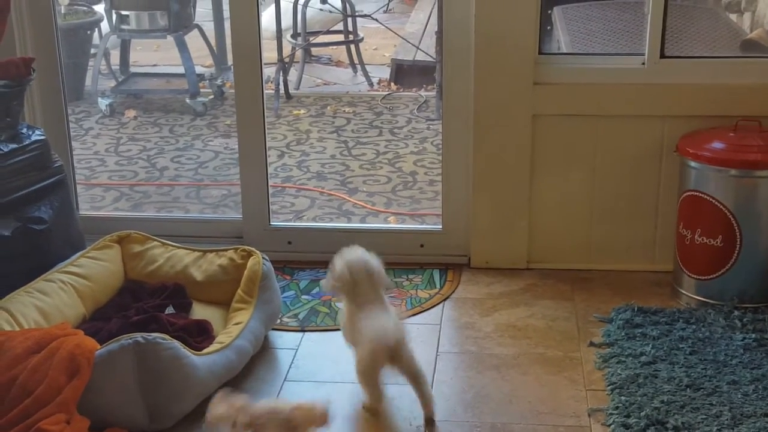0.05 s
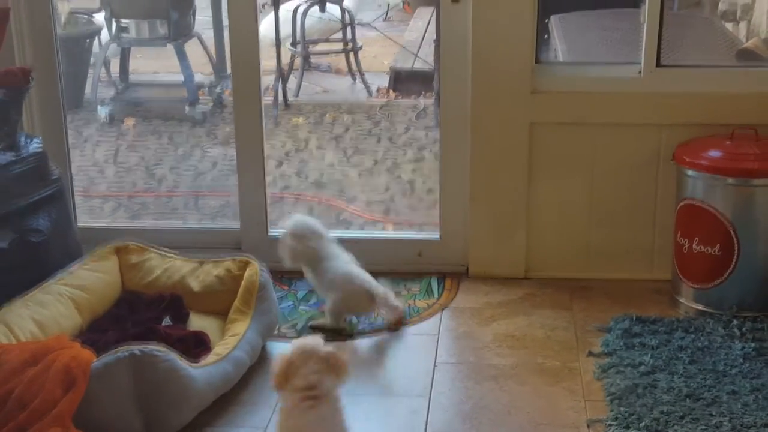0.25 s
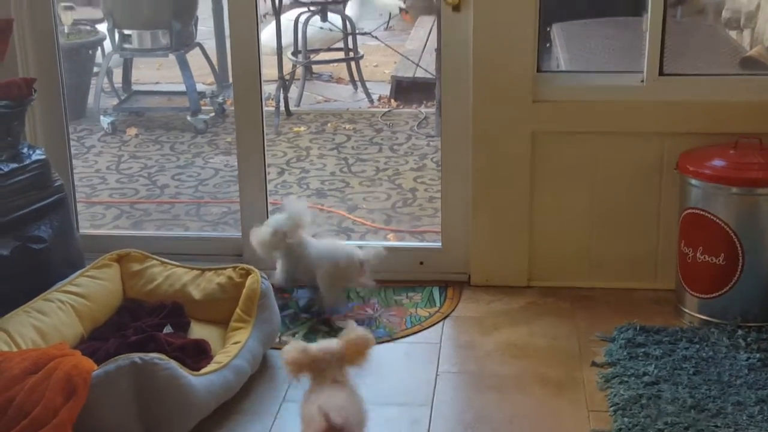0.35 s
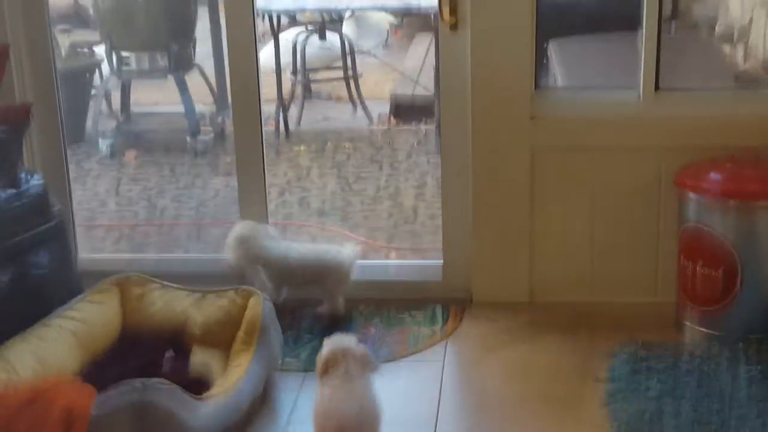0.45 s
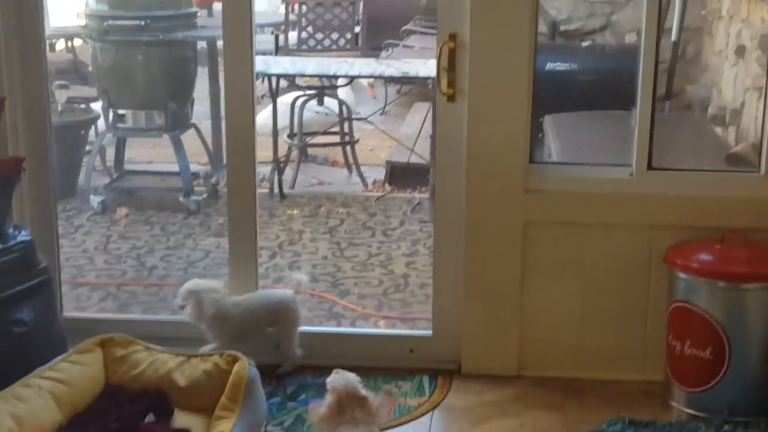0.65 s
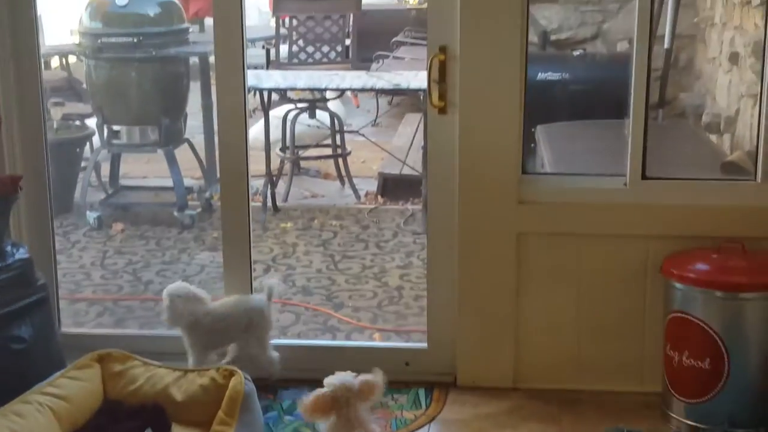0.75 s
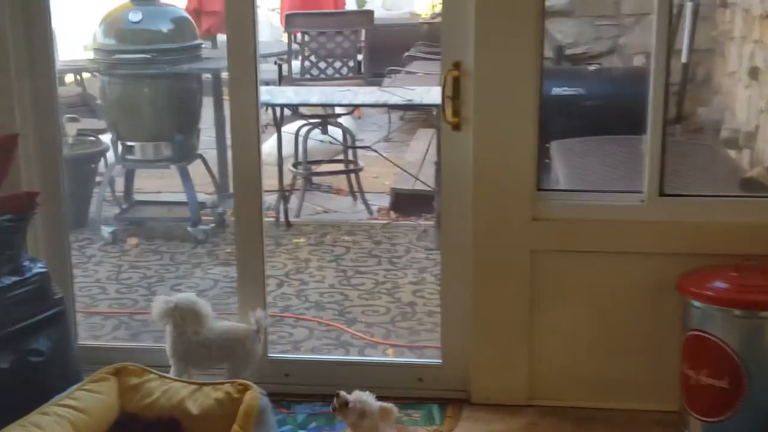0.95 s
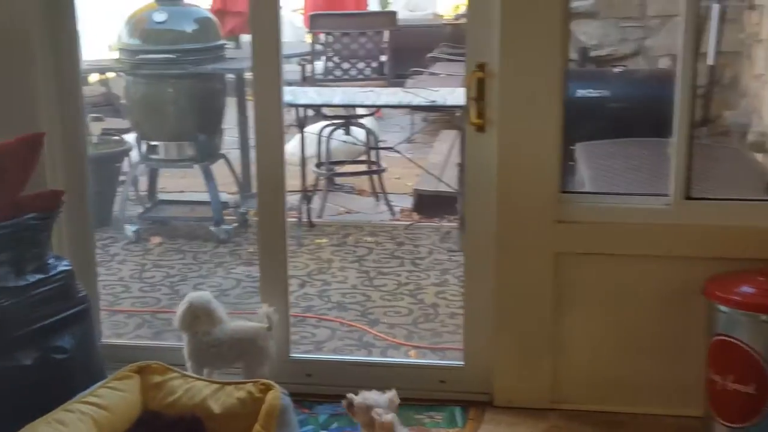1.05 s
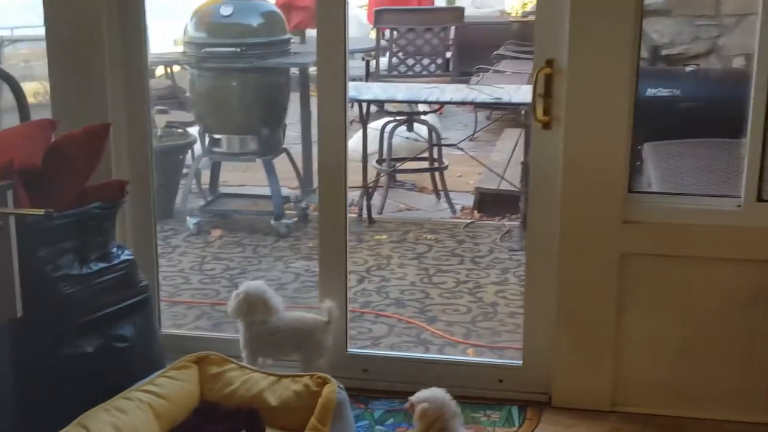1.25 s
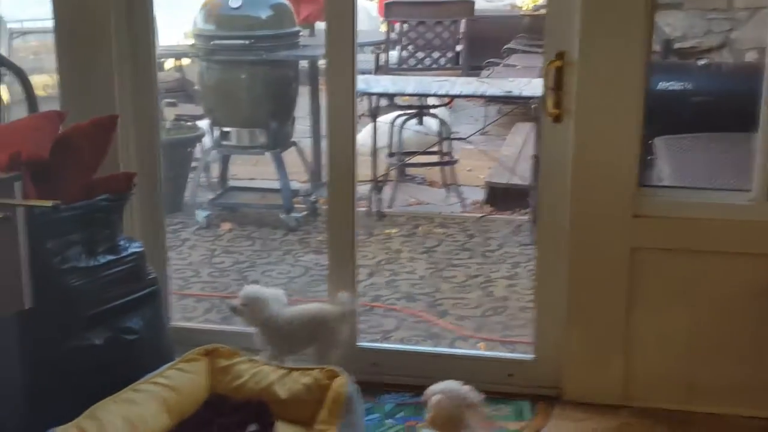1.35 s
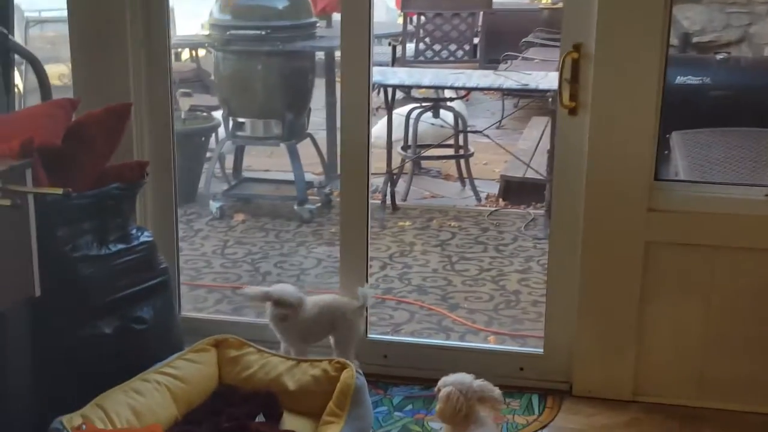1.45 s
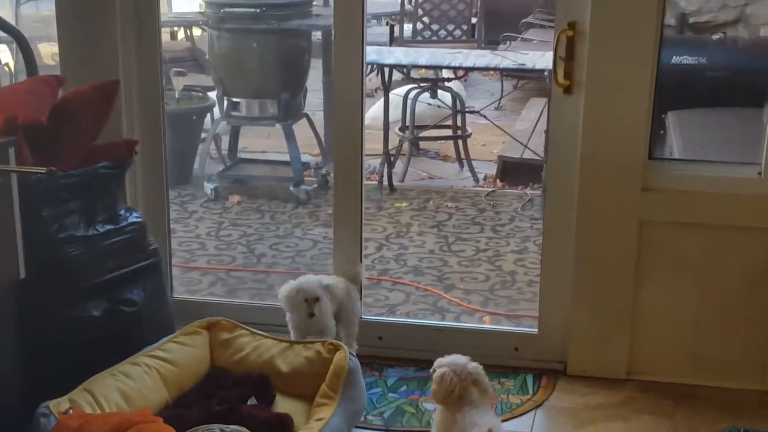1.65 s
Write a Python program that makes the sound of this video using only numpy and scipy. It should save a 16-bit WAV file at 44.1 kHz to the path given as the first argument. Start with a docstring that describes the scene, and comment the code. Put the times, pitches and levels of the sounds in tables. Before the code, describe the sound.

Small dogs give three sharp, high barks in a tiled room, each swooping up to a yelp and falling hoarsely with a short echo. Paws scuff the floor and the handheld microphone thumps softly; faint rustles follow.

```python
"""Small dogs bark in a tiled room: one bark from a nearer dog on the left, then two from another.
Vocal folds buzz through throat and mouth: each bark swoops up from a grunt to a clear yelp, then
breaks and falls hoarsely, and the room rings on. Paws scuff the floor and the handheld phone thumps
softly as it is handled; a tiny tick, rustles and a faint squeak follow over a quiet hush.
The phone's limiter holds the peaks down."""
import sys
import numpy as np
from scipy import signal
from scipy.fft import rfft, irfft
from scipy.io import wavfile
from scipy.ndimage import uniform_filter1d, minimum_filter1d

SR = 44100
rng = np.random.default_rng(int(sys.argv[2]) if len(sys.argv) > 2 else 0)


def dump_mix(stems):
    """Bounce the given channels to the path in sys.argv[1] as a 16-bit WAV at rate SR."""
    frames = np.atleast_2d(stems).T  # one column per channel
    limited = np.clip(frames, -1, 1)  # hard clip at full scale
    pcm = np.round(limited * 32767).astype(np.int16)
    wavfile.write(sys.argv[1], SR, pcm)


N = 74970

# How each bark unfolds, one table per bark: time_s, pitch_hz, level_db, roughness (0-1), mouth_open_db
BARK_SHAPES = [
    [(.204, 300, -51.5, 0.37, 9.5), (.217, 344.5, -25, 1, -26), (.228, 441.8, -19.5, 0.53, 4.5),
     (.24, 499.5, -10.5, 0.26, -4), (.251, 591, -4.5, 0.48, 4.5), (.258, 530, -18, 0.31, 24),
     (.276, 543.3, -16, 0.54, 20), (.292, 534.4, -1.5, 0.07, 2), (.312, 509.9, -8.5, 0.12, -3),
     (.334, 494, -12.5, 0.25, 10.5), (.356, 431.8, -21.5, 0.5, 0.5)],
    [(.636, 219.1, -35, 0.65, -5.5), (.648, 325.8, -27.5, 0.81, 1.5), (.657, 489.4, -15.5, 0.05, 1.5),
     (.667, 596, -11, 0.16, 7.5), (.682, 613.6, -4, 0, -9), (.702, 616.8, -15, 0.05, 17.5),
     (.719, 685.7, -5.5, 0.37, -16), (.726, 522, -10, 0.01, -6), (.742, 470.8, -10.5, 0.29, -5.5),
     (.757, 417.9, -13.5, 0.27, -5), (.776, 335.2, -27, 0.1, 7.5)],
    [(.975, 220.7, -46.5, 0.53, -0.5), (.985, 288.4, -25.5, 0.88, -7), (.996, 467.3, -23.5, 0.66, 7.5),
     (1.005, 559.6, -11, 0.37, 4.5), (1.018, 614.4, -11.5, 0.19, 6.5), (1.032, 662.8, -6.5, 0.04, 8.5),
     (1.045, 663.6, -14.5, 0.11, 15), (1.052, 523, -16, 0.28, 1), (1.068, 513.7, -8, 0.14, -8),
     (1.084, 424.2, -16.5, 0.23, -15.5), (1.11, 350.9, -22.5, 0.3, 2)],
]
# Each bark's character (a pan is left minus right): pan_db, odd_harmonics_db, hiss_db, mouth_pan_db
BARK_VOICES = [(1.9, -7, -30.5, 3), (0.6, -3, -36.5, 0), (-2.2, -0.5, -37, 7)]
# Resonances (boosted frequencies) of the throat: centre_hz, width_hz, level_db
THROAT_PEAKS = [(1143, 283, -0.5), (1574, 400, -23)]
# Mouth resonances, one table per bark, stronger as the mouth opens: centre_hz, width_hz, level_db
MOUTH_PEAKS = [
    [(2068, 420, -14), (2640, 1200, -31), (3055, 380, -22)],
    [(1620, 660, -14.5), (2366, 580, -19.5), (3038, 134, -19.5)],
    [(2058, 157, -13), (2338, 840, -26), (3249, 120, -23)],
]
# What the throat lets through around its resonances: frequency_hz, level_db
THROAT_FLOOR = [(100, -55.5), (300, -46), (520, -36.5), (750, -12), (1600, -16), (3300, -40.5),
                (4200, -50.5), (6000, -78)]
# Colour (bass-to-treble balance) of air hissing past the teeth: frequency_hz, level_db
TEETH_HISS = [(100, -34), (300, -15.5), (1000, 6.5), (3400, 9.5), (4200, 3.5), (5400, 5), (6600, -4.5),
              (8800, -2.5), (10500, -7.5), (13000, -6.5), (16000, -31.5)]
# Chesty grunts and puffs of air that open the barks: start_s, pitch_hz, grunt_db, puff_db
OPENING_GRUNTS = [(0.197, 320, -44, -43.5), (0.218, 220, -38, -49), (.635, 212.3, -40.5, -62.5),
                  (.974, 214.8, -38.5, -54)]

# Small noisy sounds: peak_s, rise_s, decay_s, level_db, pan_db
GRUFF_SWELLS = [(0.598, 0.023, 0.03, -29.5, -3)]  # a soft gruff sound before the second bark
PAW_SCUFFS = [(0.022, 0.0084, 0.028, -43.5, 4), (.053, 0.0096, 0.011, -34.5, 3.5),
              (0.086, 0.0077, 0.015, -60, -5.5), (.166, 0.0037, 0.0047, -62, 17.5),
              (.3, 0.14, 0.13, -55.5, 12), (.42, 0.015, 0.017, -47, 6), (0.459, 0.011, 0.023, -45.5, 8),
              (0.493, 0.02, 0.016, -50, -2), (1.626, .05, 0.036, -55, 2.5)]  # paws and fur brushing the floor
LOW_THUMPS = [(.04, .04, 0.11, -52, -1.5), (0.228, .015, 0.025, -42.5, 1.5),
              (0.421, 0.027, 0.11, -47.5, 4.5), (.52, .018, 0.026, -45.5, -3),
              (0.601, 0.027, 0.033, -46.5, 0)]  # soft low thumps and rumble as the phone is handled
THIN_RUSTLES = [(1.425, 0.038, 0.059, -50, -2), (1.509, 0.0092, 0.02, -53, 1),
                (1.6, 0.036, 0.043, -52, -2.5)]  # after the last bark
# Colours of those sounds, the tick and the background hush: frequency_hz, level_db
GRUFF_NOISE = [(100, -34.5), (280, -8.5), (420, -5), (650, 3), (1100, -10), (1550, 5.5), (2300, -29),
               (3200, -36.5), (4100, -20.5), (6000, -38), (16000, -42)]
SCUFF_NOISE = [(60, -7), (150, -5.5), (400, -12), (800, 0), (1300, -8.5), (2100, -2), (3500, -5),
               (6000, -2.5), (9000, 3), (11000, -5), (13500, 2.5), (16000, -7.5)]
THUMP_NOISE = [(33, -35), (70, -13.5), (135, -3.5), (190, 2), (300, 1.5), (600, -15), (2000, -54.5),
               (16000, -74.5)]
RUSTLE_NOISE = [(200, -34), (800, 3.5), (1500, 5), (2100, 3.5), (2850, 3), (3700, -7), (5500, -7.5),
                (8000, -20), (16000, -36.5)]
TICK_NOISE = [(200, 7), (1000, -18), (4000, -13), (7500, -14), (8400, -14), (9200, 11), (10000, -17),
              (10900, 3), (12000, -16), (16000, -20)]
HUSH_NOISE = [(33, -31), (44, -8), (64, 1), (100, -11), (200, -4.5), (400, -12), (1000, -8), (2500, -11.5),
              (5000, -22.5), (10000, -22), (16000, -26.5)]

# How long the room's echo takes to fade by 60 dB: frequency_hz, fade_s
ROOM_FADE = [(100, 0.87), (500, .5), (1100, 0.46), (2100, 0.49), (4000, 0.54), (9000, 0.25), (16000, .3)]
# Single notes that ring in the room: pitch_hz, fade_s (to fall 60 dB), level_db
ROOM_NOTES = [(2011.6, 0.73, -20), (3260, 0.36, -29)]

VOICE_WOBBLE_HZ = 222  # how fast a voice shakes
ALIKE_BELOW_HZ = 700  # the phone's two microphones hear much the same bass


def bark(t, shape, mouth_peaks, pan_db, odd_db, hiss_db, mouth_pan_db):
    """Vocal folds buzz through throat and mouth; roughness shakes the buzz and adds a breathy rasp."""
    pitch_shake, level_shake, growl_depth = 0.062, 0.26, 0.98
    rasp_db, breath_db, mouth_rasp_db = -4, -33.5, 6
    times, *columns = np.array(shape, float).T
    pitch, level_db, roughness, open_db = (np.interp(t, times, column) for column in columns)
    jaw = (pitch / 543.5) ** 0.69  # the throat's resonances rise with the pitch
    phase = phase_of(pitch * (1 + pitch_shake * roughness * wobble(VOICE_WOBBLE_HZ)))
    throat_tone, mouth_tone, power = 0, 0, 0
    for harmonic in range(1, 9):
        weight = undb(odd_db * (harmonic % 2))
        throat_gain = weight * throat(harmonic * pitch, jaw)
        mouth_gain = weight * undb(open_db) * resonate(mouth_peaks, harmonic * pitch)
        # harmonics above the second each waver on their own
        waver = max(harmonic - 2, 0) * (0.033 + 0.25 * roughness) * wobble(130)
        wave = np.sin(harmonic * phase + waver)
        throat_tone += throat_gain * wave
        mouth_tone += mouth_gain * wave
        power += (throat_gain + mouth_gain) ** 2 / 2
    growl = growl_depth * np.sin(phase / 2)  # every other pulse is stronger
    shake = 1 + roughness * (level_shake * wobble(VOICE_WOBBLE_HZ) + growl)
    tone = (throat_tone + pan(mouth_pan_db) * mouth_tone) / np.sqrt(power) * shake

    hz = np.fft.rfftfreq(N, 1 / SR)
    air = rfft(rng.standard_normal(N) * (1 + np.cos(phase)))  # one puff per pulse of the folds
    throat_air = irfft(air * throat(hz, jaw=0.9), N)
    mouth_air = irfft(air * resonate(mouth_peaks, hz), N) * undb(mouth_rasp_db + open_db / 2)
    rasp = (throat_air + mouth_air) / np.std(throat_air) * (undb(rasp_db) * roughness + undb(breath_db))
    # the hiss grows 0.67 dB for each dB of voice
    hiss = pan(2 * mouth_pan_db) * coloured_noise(TEETH_HISS) * undb(hiss_db + 0.67 * level_db)
    attack_s, release_s = 0.0013, 0.019
    fade = np.exp(-np.maximum(times[0] - t, 0) / attack_s - np.maximum(t - times[-1], 0) / release_s)
    return pan(pan_db) * ((tone + rasp) * undb(level_db) + hiss) * fade


def throat(hz, jaw):
    """How strongly the throat passes each frequency; a jaw above 1 moves its resonances up."""
    return resonate(THROAT_PEAKS, hz / jaw) + undb(read_curve(THROAT_FLOOR, hz))


def resonate(peaks, hz):
    """How strongly a set of steep-sided resonances passes each frequency."""
    return sum(undb(db) / (1 + (2 * (hz - centre) / width) ** 2) ** 1.5 for centre, width, db in peaks)


def grunts(t):
    """A low, shaky rising tone and a puff of air as the mouth opens."""
    rise_hz_per_s, attack_s, decay_s = 4500, 0.002, 0.027
    out = 0
    for start_s, pitch_hz, grunt_db, puff_db in OPENING_GRUNTS:
        age = np.maximum(t - start_s, 0)
        pitch = (pitch_hz + rise_hz_per_s * age) * (1 + 0.3 * wobble(VOICE_WOBBLE_HZ))
        swell = 2 * (1 - np.exp(-age / attack_s)) * np.exp(-age / decay_s)
        tone = undb(grunt_db) * np.sin(phase_of(pitch))
        out += swell * (tone + undb(puff_db) * coloured_noise(TEETH_HISS))
    return out


def noise_swells(t, events, colour):
    """Scuffs, thumps, rustles or a gruff sound: grainy noise that swells and dies away."""
    swells = 0
    for peak_s, rise_s, decay_s, level_db, pan_db in events:
        swell = np.exp(-(np.minimum(t - peak_s, 0) / rise_s) ** 2 - np.maximum(t - peak_s, 0) / decay_s)
        swells += pan(pan_db) * undb(level_db) * swell
    grain = undb(3.1 * wobble(230))  # the level flickers by about 3 dB
    return swells * grain * stereo_noise(colour)


def tick(t, peak_s=1.3395, width_s=0.00078, level_db=-35.5):
    """One tiny bright tick close by."""
    return undb(level_db) * coloured_noise(TICK_NOISE) * np.exp(-((t - peak_s) / width_s) ** 2)


def squeak(t, peak_s=1.438, width_s=0.026, pitch_hz=2900, rise_hz_per_s=6000):
    """A faint, unsteady rising tone after the barks."""
    age = t - peak_s
    pitch = (pitch_hz + rise_hz_per_s * age) * (1 + 0.032 * wobble(410))
    return undb(-48) * np.exp(-(age / width_s) ** 2) * np.sin(phase_of(pitch))


def room_echo(t, gap_s=0.0013, build_s=0.006):
    """The room's answer to a click: a dense wash of echoes that dies sooner in the treble."""
    hz = np.fft.rfftfreq(N, 1 / SR)
    shared, apart = rfft(rng.standard_normal((2, N)))
    spectrum = left_right(shared, apart, alike=np.exp(-(hz / ALIKE_BELOW_HZ) ** 2))
    build = 1 - np.exp(-np.maximum(t - gap_s, 0) / build_s)
    centres = np.geomspace(100, 16000, 40)
    out = 0
    for centre_hz, only_this_band in zip(centres, np.eye(len(centres))):
        band = np.interp(hz, centres, only_this_band)
        fade = np.exp(-np.log(1000) * t / read_curve(ROOM_FADE, centre_hz))
        tail = irfft(spectrum * band, N) * build * fade
        # a band's energy does not depend on how long it rings
        out += tail * np.sqrt(np.mean(band ** 2) / np.sum(tail ** 2, axis=1, keepdims=True))
    return out


def room_ringing(t):
    """Narrow resonances of the room, each ringing as one fading note."""
    out = 0
    for pitch_hz, fade_s, level_db in ROOM_NOTES:
        note = np.sin(2 * np.pi * (pitch_hz * t + rng.random((2, 1))))
        fade = np.exp(-np.log(1000) * t / fade_s)
        out += undb(level_db) * normalise(note * fade) / np.sqrt(N)
    return out


def hush(level_db=-59.5):
    """The quiet background of the house."""
    return undb(level_db) * stereo_noise(HUSH_NOISE)


def undb(db):
    """Turn decibels into a number to multiply by."""
    return 10 ** (np.asarray(db) / 20)


def normalise(x):
    """Scale to an average (rms) level of 1."""
    return x / np.sqrt(np.mean(x ** 2))


def pan(db):
    """Left and right gains, with the left louder by db."""
    return undb(np.array([[db], [-db]]) / 2)


def phase_of(pitch_hz):
    """The running angle of a wave whose pitch changes."""
    return 2 * np.pi * np.cumsum(pitch_hz) / SR


def read_curve(points, hz):
    """Read between a table's frequencies, spacing octaves evenly."""
    frequencies, values = np.array(points, float).T
    return np.interp(np.log(np.maximum(hz, 1)), np.log(frequencies), values)


def noise(gain):
    """Noise of level 1, with each frequency weighted by gain(hz)."""
    return normalise(irfft(rfft(rng.standard_normal(N)) * gain(np.fft.rfftfreq(N, 1 / SR)), N))


def wobble(rate_hz):
    """A random wobble, up to about this fast."""
    return noise(lambda hz: 1 / (1 + (hz / rate_hz) ** 4))


def coloured_noise(colour):
    """Noise shaped by a colour table."""
    return noise(lambda hz: undb(read_curve(colour, hz)))


def left_right(shared, apart, alike):
    """Mix two noises into left and right: unrelated when alike is 0, the same when it is 1."""
    return shared * np.sqrt(1 + alike) + apart * np.sqrt(1 - alike) * np.array([[1], [-1]])


def stereo_noise(colour):
    """Coloured noise at both microphones, most alike in the bass."""
    hz = np.fft.rfftfreq(N, 1 / SR)
    alike = 0.1 + 0.8 * np.exp(-(hz / ALIKE_BELOW_HZ) ** 2)
    shared, apart = rfft(coloured_noise(colour)), rfft(coloured_noise(colour))
    return normalise(irfft(left_right(shared, apart, alike), N))


def scene():
    """Barks and small movements, heard directly and through the room."""
    direct_db, dog_echo_db, small_echo_db = -3.5, -2, -5
    low_cut_hz = 188  # the dogs give out little below this
    t = np.arange(N) / SR
    room = room_echo(t) + room_ringing(t)
    dogs = grunts(t)
    for shape, mouth_peaks, voice in zip(BARK_SHAPES, MOUTH_PEAKS, BARK_VOICES):
        dogs = dogs + bark(t, shape, mouth_peaks, *voice)
    dogs = signal.sosfilt(signal.butter(4, low_cut_hz, "highpass", fs=SR, output="sos"), dogs)
    scuffs = noise_swells(t, PAW_SCUFFS, SCUFF_NOISE)
    thumps = noise_swells(t, LOW_THUMPS, THUMP_NOISE)
    gruff = noise_swells(t, GRUFF_SWELLS, GRUFF_NOISE)
    rustles = noise_swells(t, THIN_RUSTLES, RUSTLE_NOISE)
    small_sounds = scuffs + thumps + gruff + rustles + squeak(t)
    into_room = undb(dog_echo_db) * dogs + undb(small_echo_db) * small_sounds
    echo = signal.fftconvolve(into_room, room, axes=1)[:, :N]
    return undb(direct_db) * (dogs + small_sounds) + echo + tick(t) + hush()


def record(dry):
    """The phone's limiter turns the loudest peaks down, and the highest treble is cut."""
    ceiling_db, smooth_s, top_hz = -2, 0.004, 15700
    window = int(smooth_s * SR)
    gain = np.minimum(1, undb(ceiling_db) / (np.abs(dry).max(axis=0) + 1e-9))
    gain = uniform_filter1d(minimum_filter1d(gain, window), window)
    return signal.sosfilt(signal.ellip(10, 0.2, 70, top_hz, fs=SR, output="sos"), dry * gain)


dry = scene()
out = record(dry)
dump_mix(out)
```